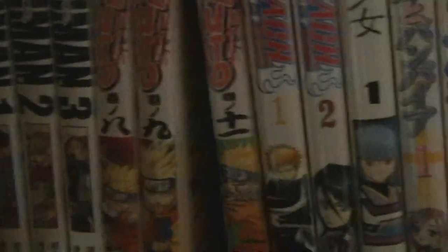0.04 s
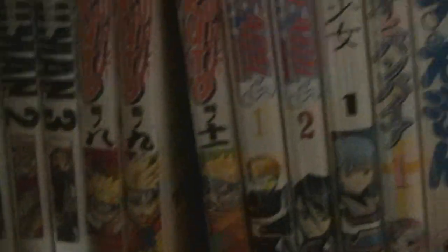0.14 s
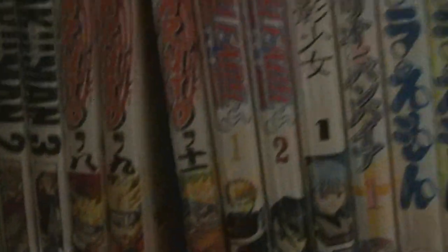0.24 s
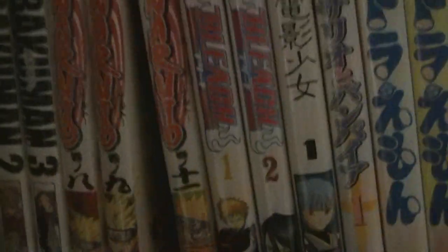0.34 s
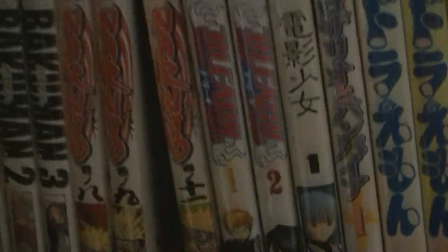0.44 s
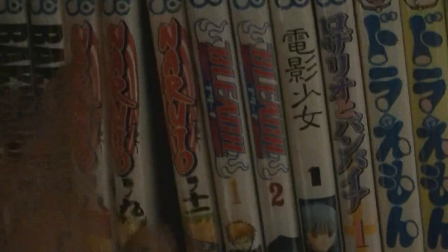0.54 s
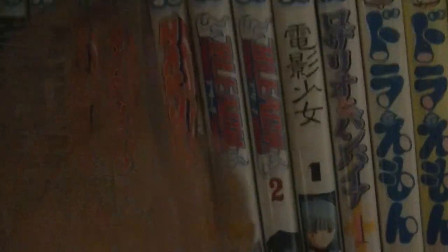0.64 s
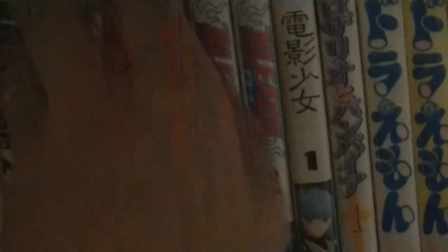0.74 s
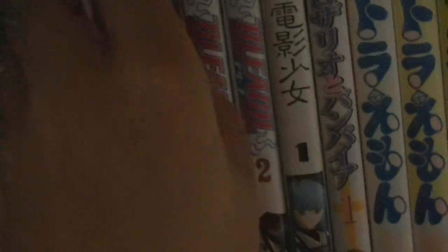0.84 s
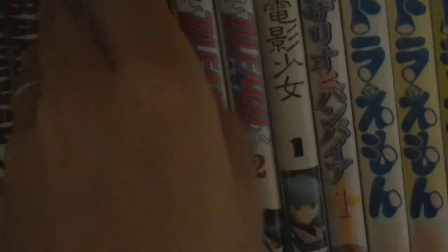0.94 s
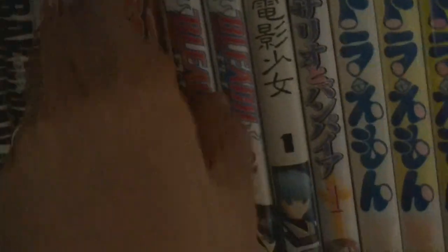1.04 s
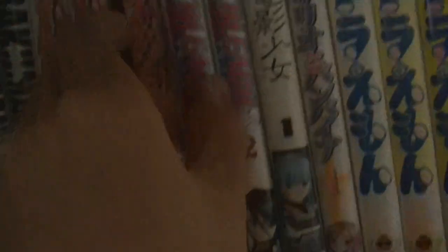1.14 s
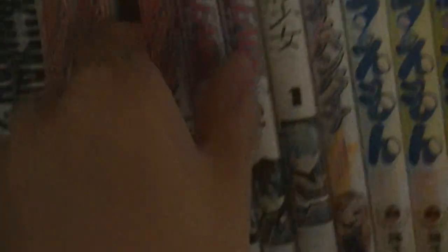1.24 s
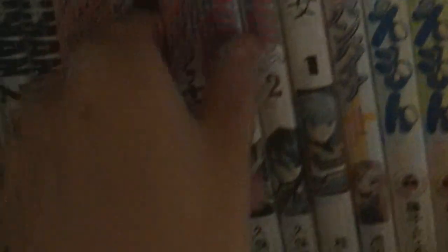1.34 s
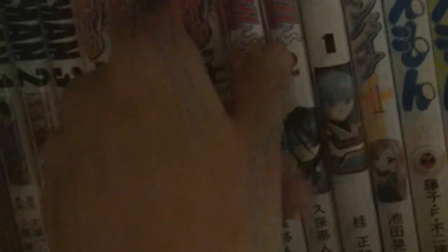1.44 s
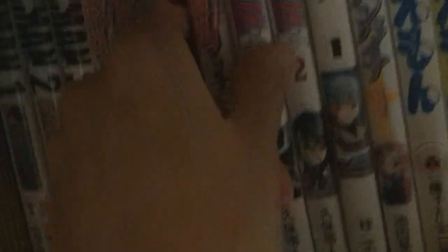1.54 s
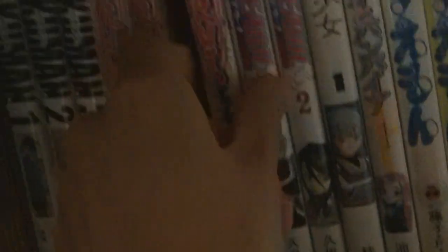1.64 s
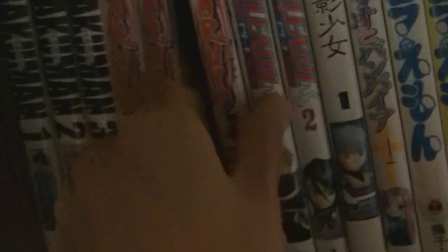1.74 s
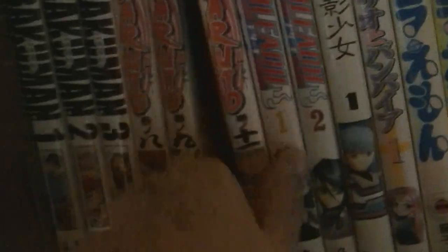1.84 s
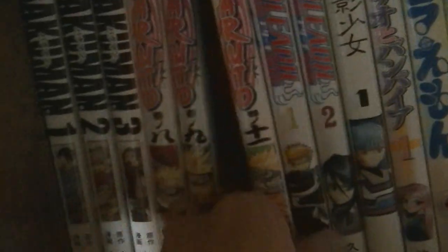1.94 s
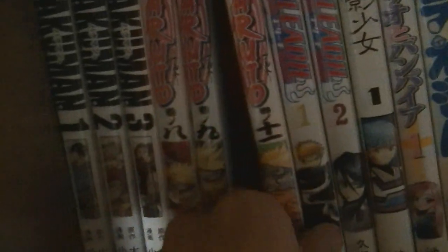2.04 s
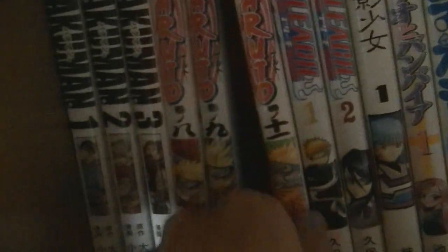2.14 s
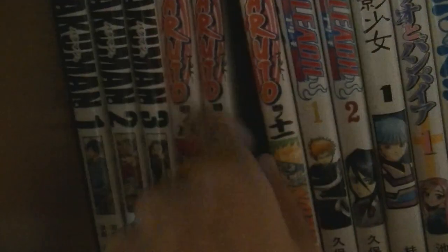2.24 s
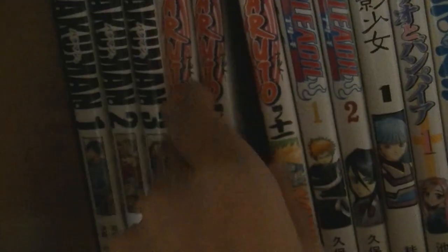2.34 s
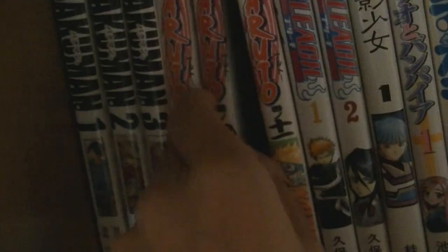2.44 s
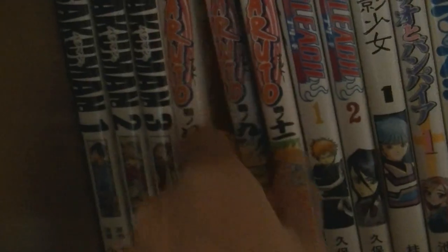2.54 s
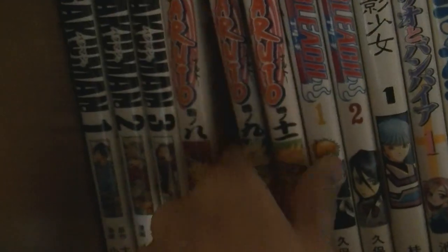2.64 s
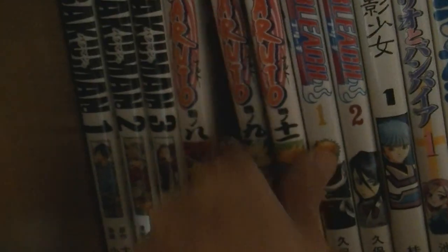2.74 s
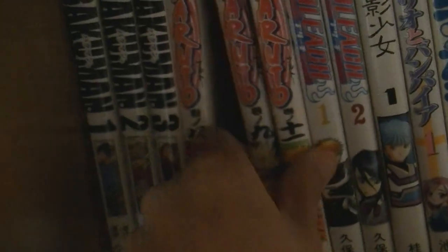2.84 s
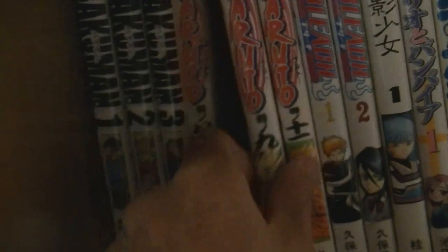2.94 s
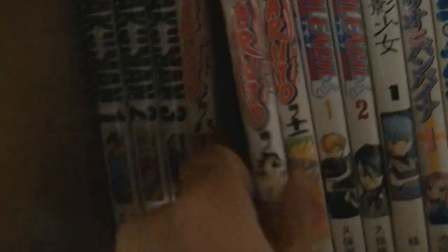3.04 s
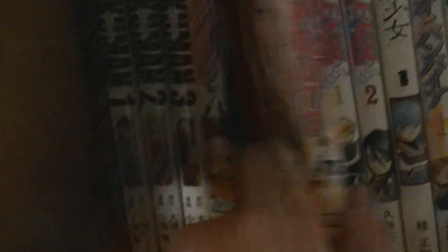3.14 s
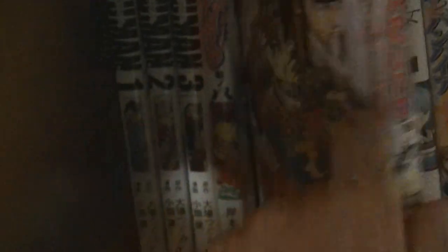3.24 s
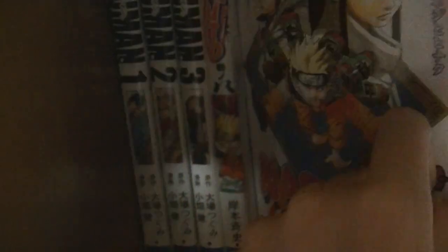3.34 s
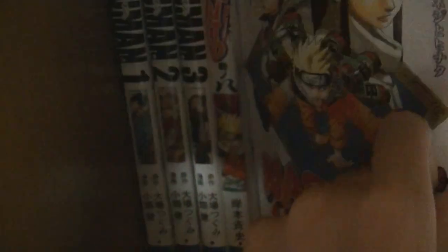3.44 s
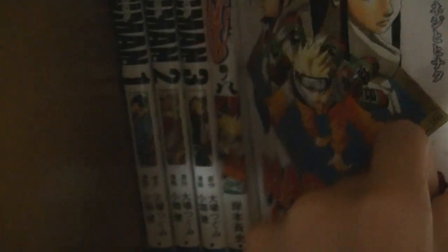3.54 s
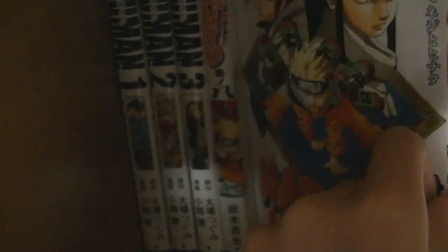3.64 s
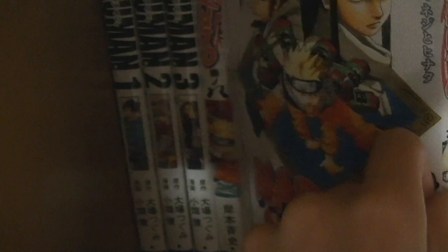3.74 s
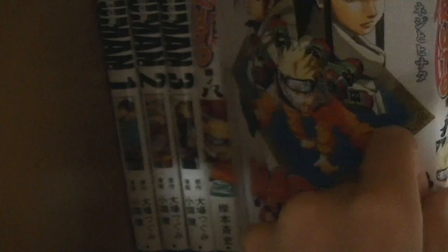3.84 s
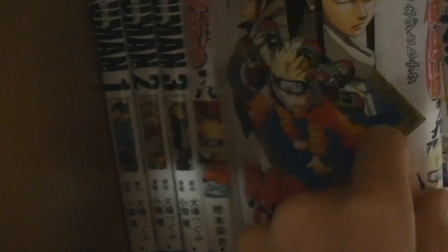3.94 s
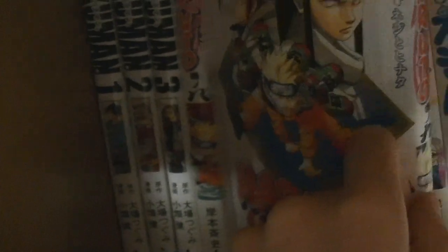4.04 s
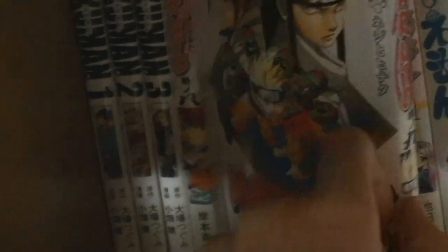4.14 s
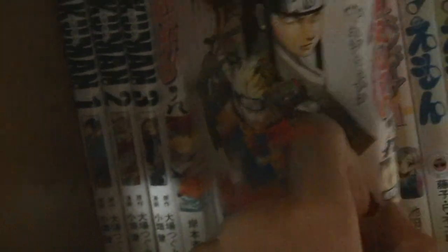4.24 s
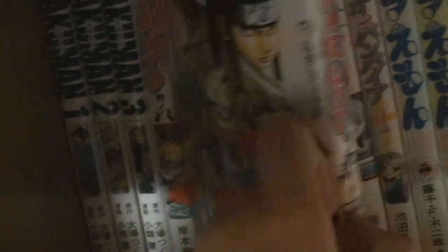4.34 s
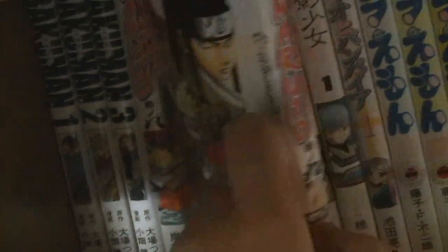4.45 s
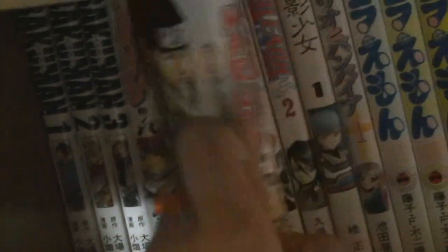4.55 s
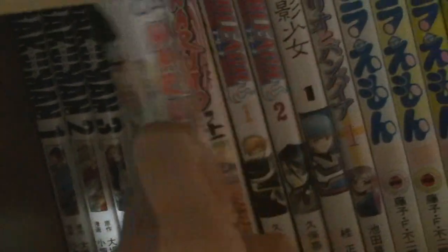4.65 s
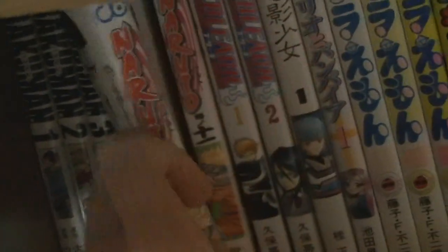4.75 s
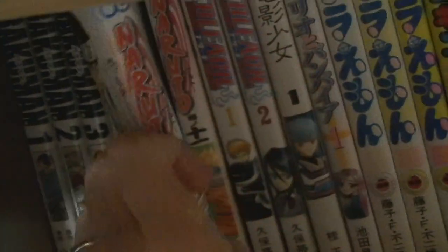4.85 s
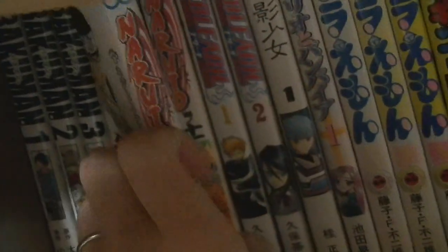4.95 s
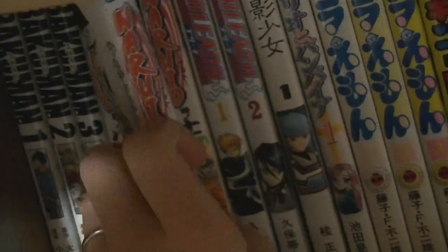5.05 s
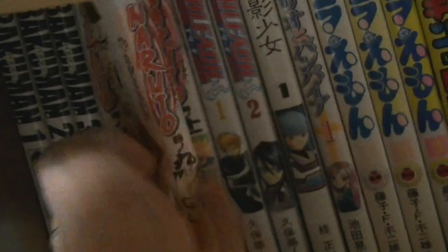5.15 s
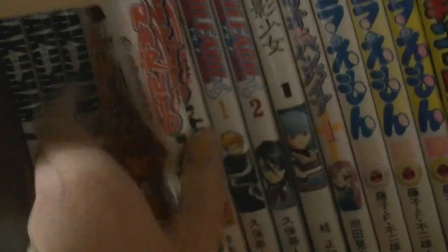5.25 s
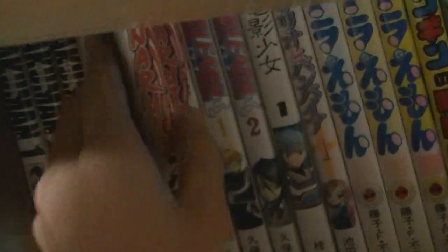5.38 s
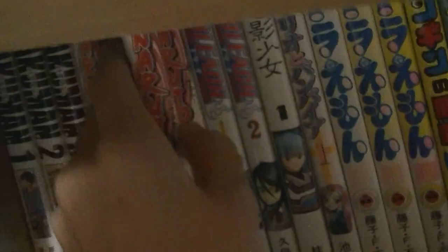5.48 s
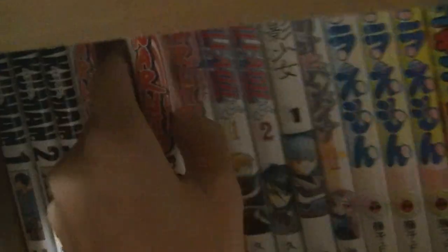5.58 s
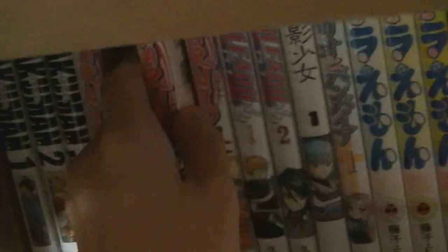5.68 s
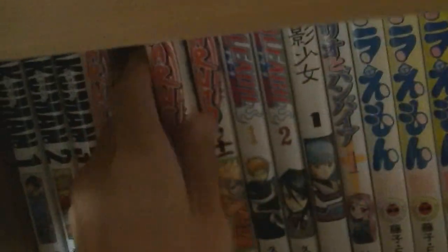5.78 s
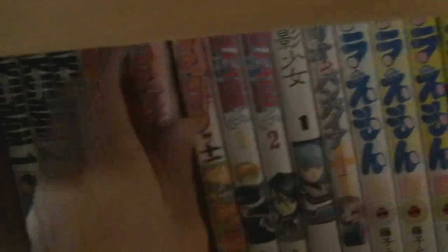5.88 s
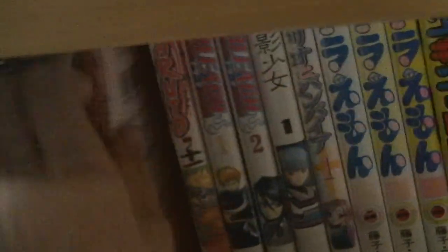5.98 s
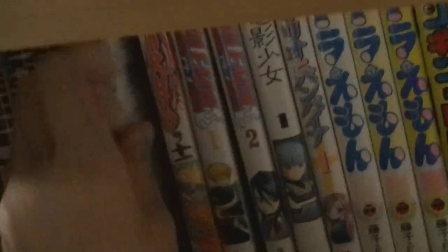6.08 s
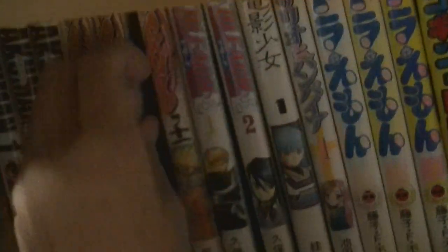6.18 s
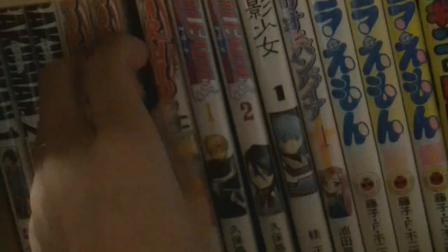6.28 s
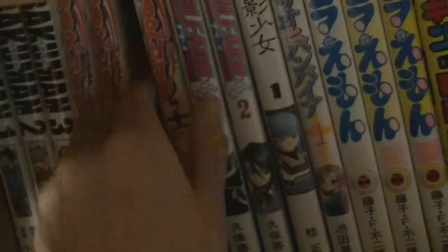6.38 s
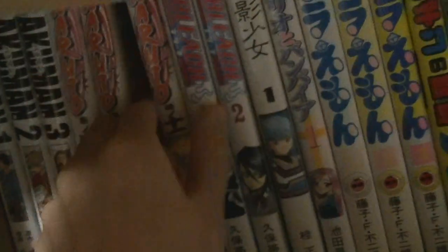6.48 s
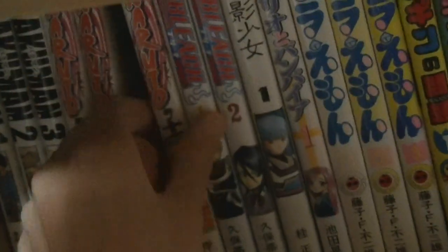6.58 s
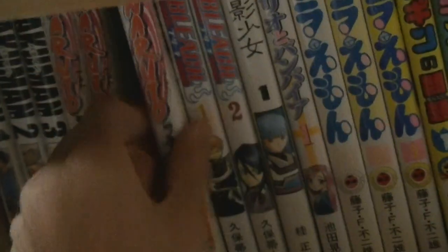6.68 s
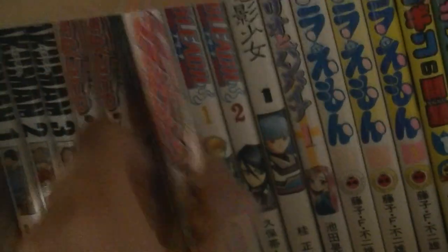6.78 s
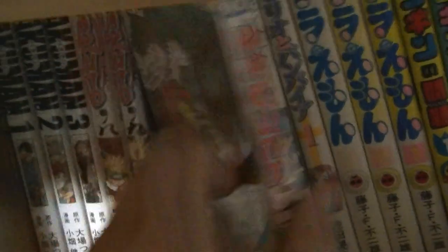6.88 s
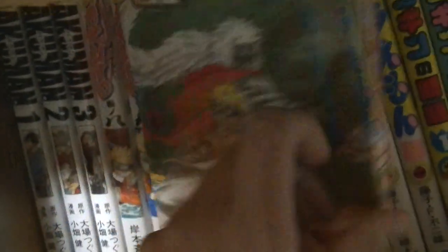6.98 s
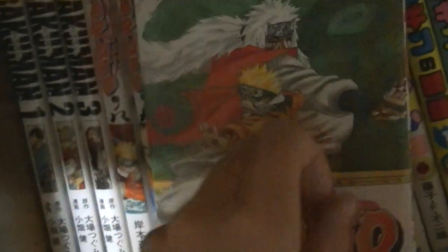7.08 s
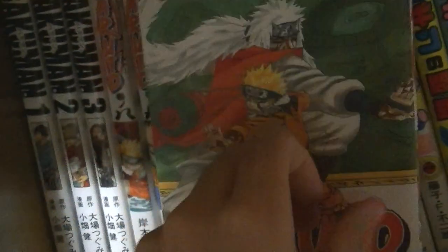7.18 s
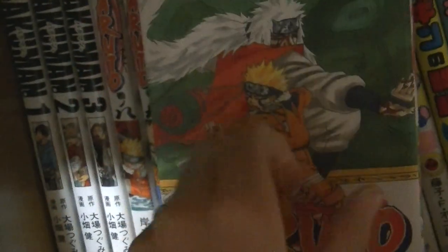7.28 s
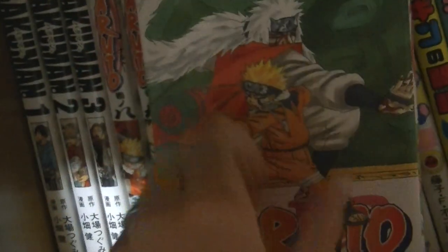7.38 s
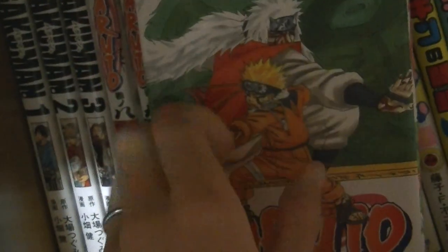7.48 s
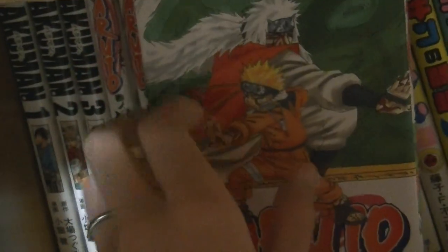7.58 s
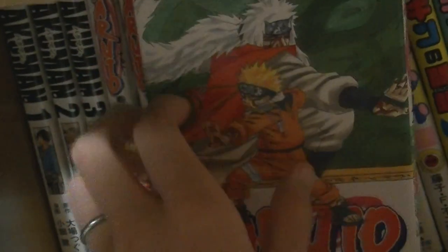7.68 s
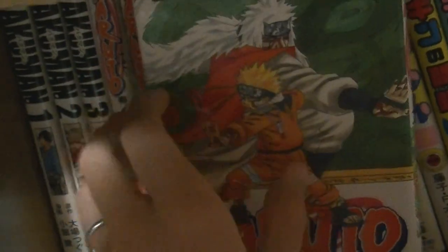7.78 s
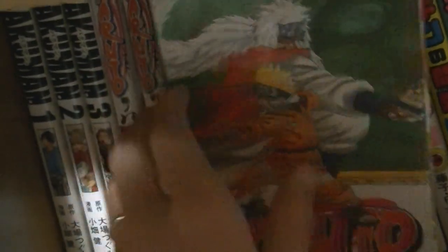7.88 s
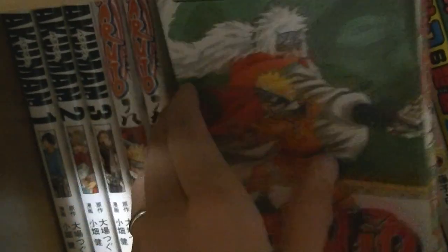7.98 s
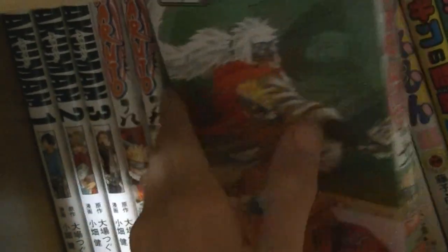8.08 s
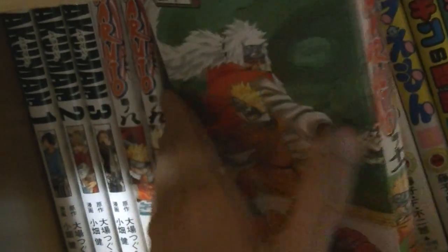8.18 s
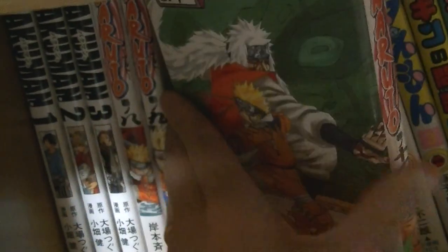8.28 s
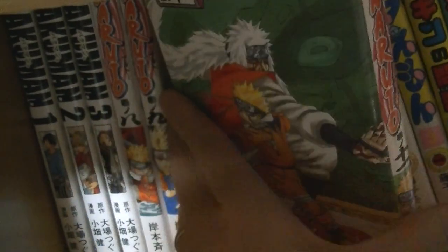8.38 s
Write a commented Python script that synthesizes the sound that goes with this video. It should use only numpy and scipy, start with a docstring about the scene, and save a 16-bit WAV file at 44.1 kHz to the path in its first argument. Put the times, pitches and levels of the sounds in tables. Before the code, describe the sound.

Paperbacks on a wooden shelf knock, rustle and slide as they are pulled out and pushed back, close up in a quiet room.

```python
"""A wooden shelf in a quiet room: paperbacks are pulled from and pushed into a row, close to the microphone.
Blows excite decaying modes of shelf and books. Fingers and covers slide with a papery hiss, page blocks rasp
and book edges drag on the board: all friction, made of random catches sent through filters and resonances.
Some rubs sing on one narrow note, and heavy shoves puff out air. Shaped noise makes the room and microphone
hiss. The books are nearly mono."""
import sys
import numpy as np
from scipy import signal
from scipy.fft import rfft, irfft, next_fast_len
from scipy.io import wavfile

SR = 44100
rng = np.random.default_rng(int(sys.argv[2]) if len(sys.argv) > 2 else 0)


def master_out(mix):
    """Clip the mix to full scale and print it as 16-bit PCM to the path in sys.argv[1]."""
    frames = np.transpose(np.atleast_2d(mix))
    ceiling = np.clip(frames, -1, 1)
    pcm = np.round(ceiling * 32767).astype(np.int16)
    wavfile.write(sys.argv[1], SR, pcm)


N = 371322   # length [samples]


def from_db(db):
    """Level definition: the amplitude gain of a level in dB."""
    return 10 ** (np.asarray(db) / 20)


def rms_one(x):
    """Normalisation of power: scale to rms 1."""
    return x / np.sqrt(np.mean(x ** 2) + 1e-20)


def butter(x, order, hz, kind="low"):
    """Butterworth filtering: a maximally flat passband."""
    return signal.sosfilt(signal.butter(order, hz, kind, fs=SR, output="sos"), x)


def drift(corner_hz):
    """Low-passed noise: a slow random wander of rms 1 through two equal poles."""
    step = 40   # samples between the points of the wander
    settle = 2000   # points dropped while the filter settles
    pole = np.exp(-2 * np.pi * corner_hz * step / SR)
    noise = rng.standard_normal(N // step + settle + 2)
    slow = rms_one(signal.lfilter([1], [1, -2 * pole, pole * pole], noise)[settle:])
    return np.interp(np.arange(N) / step, np.arange(len(slow)), slow)


def shaped(x, spectrum):
    """Spectral shaping: a gain curve drawn straight on a log-frequency axis; rms 1."""
    size = next_fast_len(N)
    hz, db = np.transpose(spectrum)
    bin_hz = np.arange(size // 2 + 1) * SR / size
    gain = from_db(np.interp(np.log(bin_hz + 1), np.log(hz), db))
    return rms_one(irfft(rfft(x, size) * gain, size)[:N])


def resonate(x, hz, width_hz):
    """Damped resonance: two poles, gain 1 on top; a wider peak rings shorter."""
    r = np.exp(-np.pi * width_hz / SR)
    poles = [1, -2 * r * np.cos(2 * np.pi * hz / SR), r * r]
    return signal.lfilter([(1 - r * r) / 2, 0, (r * r - 1) / 2], poles, x)


def slips(per_s, spread_db, clump_db, clump_hz):
    """Stick-slip friction: tiny catches at random moments, of uneven size, coming in clumps."""
    sizes = from_db(spread_db * np.minimum(rng.exponential(1, N), 4))
    signs = rng.choice([-1, 1], N)
    happens = rng.random(N) < per_s / SR
    return sizes * signs * happens * from_db(clump_db * drift(clump_hz)) + 1e-18


def soft(x, contact_hz):
    """Finite contact time: a low-pass rounds the start of the ring; peak 1."""
    x = butter(x, 2, contact_hz)
    return x / np.abs(x).max()


# Modes of the shelf board and book row: (frequency [Hz], level [dB], free ring T60 [s])
SHELF_MODES = [(130.6, -5.5, 0.2), (182.2, 1, 0.16), (222, -0.5, 0.11), (293, 1, 0.1), (360, -0.5, 0.082),
               (435.8, 6, 0.082), (522, -6.5, 0.21), (646, -1.5, 0.036), (797.6, -1, 0.057),
               (1000, 0.5, 0.044), (1145, 2, 0.029), (1396, -5.5, 0.039), (1673, 1, 0.014),
               (2290, -5.5, 0.013)]
# Blows of books on each other and on the shelf, levels before the shelf's bass cut:
# (time [s], clack peak [dB], thud peak [dB], favoured pitch [Hz], edge tick peak [dB], share of the free ring)
BLOWS = [(0.6733, -40, -40, 280, -25.5, 0.6), (0.6812, -23, -28.5, 310, -23.5, 0.9),
         (0.6935, -24, -28, 265, -26, 0.7), (0.7092, -6.5, -1, 410, -24, 0.56),
         (0.7225, -16.5, -4.5, 180, -54, 0.4), (0.747, -34, -24, 330, -56, 0.81),
         (1.1508, -48, -38, 220, -40, 0.76), (1.192, -19, -15, 383, -49, 0.58),
         (1.3632, -49, -30.5, 139, -55, 0.5), (1.495, -31.5, -26, 263, -53, 0.7),
         (1.5185, -21, -23, 232, -35, 0.86), (1.6955, -38, -37, 410, -57, 1),
         (1.7107, -41, -36.5, 330, -50, 0.67), (1.774, -52, -37, 280, -60, 0.5),
         (1.803, -50, -35, 300, -55, 0.56), (1.89, -55, -36.5, 220, -55, 0.99),
         (1.948, -48, -38, 220, -55, 0.74), (2.2117, -31.5, -34, 360, -29.5, 0.57),
         (2.2616, -22, -33, 390, -29, 0.45), (2.3411, -23, -34, 380, -27.5, 0.41),
         (2.5306, -30, -35, 370, -35, 0.34), (2.669, -42, -48, 300, -32.5, 0.6),
         (2.775, -32, -28, 240, -40, 1), (2.9619, -1, -11.5, 334, -39, 0.91),
         (3.207, -30, -56, 340, -32, 0.47), (3.2269, -27.5, -21, 390, -48, 0.93),
         (4.5723, -17.5, -30, 380, -36, 0.74), (4.6784, -29, -53, 310, -27.5, 0.89),
         (4.738, -30, -32, 200, -37, 0.6), (5.1121, -28.5, -34.5, 340, -41, 0.65),
         (5.2076, -33.5, -28, 300, -11.5, 0.75), (5.395, -29, -27.5, 410, -36, 0.89),
         (5.475, -24.5, -27.5, 278, -42, 1), (5.51, -28, -40, 300, -23.5, 0.6),
         (5.514, -28, -22.5, 200, -42, 0.52), (5.535, -43, -20, 170, -55, 0.38),
         (5.5585, -27, -18.5, 280, -25, 0.86), (5.5804, 2, -5, 400, -17.5, 0.86),
         (5.6104, -17, -15, 290, -30, 0.66), (5.637, -18.5, -22, 330, -22.5, 0.38),
         (5.6447, -22, -24, 230, -26, 0.48), (5.8108, -25.5, -23, 264, -45, 0.66),
         (5.8757, -17.5, -24, 425, -37, 0.44), (5.918, -26, -26.5, 270, -32, 0.64),
         (6.022, -25.5, -25.5, 207.7, -26, 0.75), (6.1529, -3.5, -12.5, 373, -19.5, 1),
         (6.16, -14, -2.5, 343, -37, 0.78), (6.167, -24, -5, 300, -49, 0.86),
         (6.177, -19.5, -7, 131, -52, 0.72), (6.5757, -9.5, -16.5, 310, -37, 0.77),
         (6.8192, -9, -1, 366, -38, 0.72), (6.838, -26, -27, 300, -45, 0.83),
         (6.9033, -19, -13.5, 210, -28, 1), (6.9157, -12.5, -15, 240, -23, 0.59),
         (6.934, -9.5, -19, 250, -24, 0.38), (6.9426, -13.5, -10, 290, -19.5, 0.49),
         (6.982, -18.5, -14, 252, -18, 0.88), (7.1017, -20, -17.5, 230, -36, 0.82),
         (7.1211, -28, -27, 201, -38, 1), (7.262, -42, -64, 348, -38, 1), (7.271, -37, -38, 190, -49, 1),
         (7.802, -33, -30, 210, -41, 0.81), (7.822, -20.5, -31, 200, -33, 1),
         (8.0096, -25, -21.5, 217, -45, 1), (8.2324, -39.5, -32, 232.9, -48, 0.8)]
CLACK_FROM_HZ = 600   # modes above form the clack, the others the thud
FAVOUR_OCTAVES, FAVOUR_DEPTH_DB = 0.45, 11.5   # spread and boost of the modes near the favoured pitch
CLACK_CONTACT_HZ, THUD_CONTACT_HZ = 2420, 676   # contact low-pass when clack and thud are equal; of any thud
SHARPER_OCTAVES_PER_DB = 0.07   # a blow that is more clack than thud has a harder, shorter contact
SPREAD_S = 0.0012   # scale of the random delay of the lower modes
TICK_T60_S, TICK_HZ, TICK_TOP_HZ = 0.012, 2150, 7800   # decay and band of the edge tick


def edge_ticks(length):
    """Broadband impact noise: one decaying burst of band-passed noise for each blow; peak 1."""
    grit = rng.standard_normal((len(BLOWS), length))
    grit = butter(grit, 1, [TICK_HZ, TICK_TOP_HZ], "band")
    grit = grit * from_db(-60 * np.arange(length) / SR / TICK_T60_S)
    return grit / np.abs(grit).max(axis=1, keepdims=True)


def knocks():
    """Modal excitation: each blow rings the upper modes as a clack and the lower as a thud; its edge ticks."""
    out, t = np.zeros(N + SR), np.arange(SR // 4) / SR
    hz, db, t60 = np.repeat(np.transpose(SHELF_MODES), 2, axis=1)   # every mode splits into a close pair
    upper = hz > CLACK_FROM_HZ
    luck = rng.standard_normal((len(BLOWS), 3, len(hz)))
    for blow, (strength, detune, lateness), tick in zip(BLOWS, luck, edge_ticks(len(t))):
        s, clack_db, thud_db, favoured_hz, tick_db, share = blow
        contact_hz = CLACK_CONTACT_HZ * 2 ** (SHARPER_OCTAVES_PER_DB * (clack_db - thud_db))
        nearness = np.exp(-.5 * (np.log2(hz / favoured_hz) / FAVOUR_OCTAVES) ** 2)
        gains = from_db(db + FAVOUR_DEPTH_DB * nearness + 2.2 * strength)
        pitch = hz * (1 + 0.065 * detune)   # the row is loaded differently each time
        # the modes join in one after another as the blow spreads through the row
        late_s = SPREAD_S * np.abs(lateness) * np.minimum(CLACK_FROM_HZ / hz, 1) ** 2
        since = np.maximum(t - (late_s - late_s.min())[:, None], 0)
        decay = from_db(-60 * since / (t60[:, None] * max(share, .1)))
        rings = np.sin(2 * np.pi * pitch[:, None] * since) * decay
        clack = from_db(clack_db) * soft((gains * upper) @ rings, min(contact_hz, SR / 4))
        thud = from_db(thud_db) * soft((gains * ~upper) @ rings, THUD_CONTACT_HZ)
        at = round(s * SR)
        # the thud swings back against the clack
        out[at:at + len(t)] += clack - thud + from_db(tick_db) * tick
    return out[:N]


# Short strokes of fingers and books; at start and stop the level is down by the swell and fade depths:
# (start [s], fastest [s], stop [s], cover hiss [dB], page block rasp [dB], drag on the board [dB])
SHORT_STROKES = [(0.0, 0.528, 1.8, -63.5, -64.5, -60), (0.668, 0.685, 0.84, -44, -45, -41),
                 (0.868, 0.882, 0.94, -48, -74, -69), (0.925, 1.187, 1.64, -55.5, -60, -55.5),
                 (1.483, 1.51, 1.64, -53, -54, -50), (1.56, 1.626, 1.71, -48.5, -43.5, -58),
                 (1.708, 1.845, 2.055, -49.5, -51, -52), (2.01, 2.178, 2.27, -50, -59, -64),
                 (2.264, 2.302, 2.47, -55, -62, -53), (2.528, 2.564, 2.614, -39, -37.5, -42),
                 (2.593, 2.644, 2.85, -56, -51.5, -52.5), (2.753, 2.765, 2.82, -55, -43.5, -45),
                 (3.19, 3.207, 3.24, -33, -39, -45), (3.208, 3.315, 3.4, -44, -41, -44),
                 (4.017, 4.124, 4.3, -71, -55, -56), (5.128, 5.149, 5.23, -42.5, -40.5, -40.5),
                 (5.204, 5.265, 5.51, -46, -51.5, -46), (5.363, 5.427, 5.42, -54.5, -40, -41.5),
                 (5.447, 5.469, 5.55, -48, -37.5, -41), (5.507, 5.51, 5.57, -54.5, -34.5, -34),
                 (5.542, 5.551, 5.7, -52.5, -39, -33.5), (5.581, 5.614, 5.756, -37.5, -32, -30.5),
                 (5.677, 5.86, 5.99, -51.5, -45.5, -44.5), (5.892, 5.978, 6.15, -45, -40, -38.5),
                 (6.044, 6.157, 6.18, -38.5, -37, -35), (6.15, 6.205, 6.26, -71, -49.5, -37),
                 (6.25, 6.304, 6.42, -54, -75, -62), (6.333, 6.423, 6.45, -52.5, -60, -55),
                 (6.455, 6.483, 6.64, -59, -61, -57.5), (7.248, 7.262, 7.5, -60, -60, -66),
                 (7.502, 7.564, 7.78, -54.5, -47.5, -48), (7.618, 7.697, 7.74, -46.5, -41, -55.5),
                 (7.797, 7.821, 8.1, -58, -36, -45), (7.808, 7.925, 8.005, -37, -36.5, -47.5),
                 (7.975, 8.017, 8.05, -53, -45.5, -55), (8.02, 8.127, 8.21, -45.5, -44, -50),
                 (8.154, 8.205, 8.56, -57, -59.5, -57)]
SWELL_DB, SWELL_POWER, FADE_DB, FADE_POWER = 18.5, 1.53, 25.5, 1.2   # depth and curvature of rise and fall
# top of the hiss, relative to the hiss, in short strokes; it sinks as the rasp outweighs the hiss
STROKE_TOP_DB, DULLER_PER_DB = 5, 0.2
# A whole book is drawn out, pushed in, drawn out; one curve for each slide:
# (time [s], cover hiss [dB], page block rasp [dB], drag on the board [dB])
SLIDE_CURVES = [
    [(2.79, -66, -56, -40), (2.88, -49, -50.5, -56.5), (3.01, -45.5, -41.5, -46), (3.03, -37, -38.5, -37),
     (3.15, -41.5, -60, -39.5), (3.175, -49, -47, -54), (3.20, -69, -51, -43)],
    [(4.19, -78, -64, -62), (4.30, -60, -50, -45.5), (4.55, -49, -44, -39), (4.63, -52, -46, -41.5),
     (4.72, -45, -39.5, -42), (4.76, -52, -46.5, -48), (4.83, -44.5, -38, -42), (4.98, -41, -45, -42.5),
     (5.09, -44, -43, -47.5), (5.125, -61, -60, -57)],
    [(6.56, -68, -68, -52), (6.60, -44.5, -45.5, -55), (6.72, -45.5, -48.5, -51.5),
     (6.88, -43, -40.5, -33.5), (6.95, -49, -48, -38), (7.0, -44.5, -41.5, -46), (7.11, -48, -38, -51),
     (7.145, -77, -57, -64)],
]
# Top of the hiss relative to the hiss, one value for each long slide: (level [dB])
SLIDE_TOP_LEVELS = [10.5, 1.5, 7.5]


def sliding():
    """Addition of powers: gains of hiss, rasp, drag and top; strokes swell and fade, slides follow curves."""
    power, t = np.zeros((4, N)), np.arange(N) / SR
    for start, fastest, stop, hiss_db, rasp_db, drag_db in SHORT_STROKES:
        # the tails run on to twice the time between start or stop and the fastest moment
        now = slice(max(round((2 * start - fastest) * SR), 0), round((2 * stop - fastest) * SR))
        before = np.maximum(fastest - t[now], 0) / max(fastest - start, .002)
        after = np.maximum(t[now] - fastest, 0) / max(stop - fastest, .002)
        shape = from_db(-SWELL_DB * before ** SWELL_POWER - FADE_DB * after ** FADE_POWER)
        top_db = hiss_db + STROKE_TOP_DB - DULLER_PER_DB * (rasp_db - hiss_db)
        power[:, now] += np.outer(from_db([hiss_db, rasp_db, drag_db, top_db]), shape) ** 2
    for curve, top_db in zip(SLIDE_CURVES, SLIDE_TOP_LEVELS):
        s, hiss_db, rasp_db, drag_db = np.transpose(curve)
        now = slice(round(s[0] * SR), round(s[-1] * SR))
        levels = (hiss_db, rasp_db, drag_db, hiss_db + top_db)
        power[:, now] += [from_db(np.interp(t[now], s, db)) ** 2 for db in levels]
    return np.sqrt(power)


# Spectrum of the cover hiss: (frequency [Hz], relative level [dB per Hz])
COVER_SPECTRUM = [(1060, -8.5), (2410, -5), (2900, -3.5), (4020, -6), (7090, -8), (9250, -11), (13300, -20),
                  (16000, -26)]
BRIGHT_HZ = 9700   # the top of the hiss begins here


def cover_hiss():
    """Dense friction noise of skin and glossy card: very many fine catches; the finest form the top."""
    coarse = shaped(slips(9000, spread_db=1.5, clump_db=2.5, clump_hz=43), COVER_SPECTRUM)
    fine = shaped(slips(15000, spread_db=1.5, clump_db=2.5, clump_hz=35), COVER_SPECTRUM)
    return butter(coarse, 2, BRIGHT_HZ), butter(fine, 2, BRIGHT_HZ, "high")


# Resonances of the page block: (frequency [Hz], base width, broadened in use [Hz], relative level [dB])
PAGE_RESONANCES = [(754, 284, -1), (1050, 198, 4.5), (1510, 296, 1), (2085, 1300, -14)]


def page_rasp():
    """Friction-driven resonance: page blocks rubbing ring in a few broad bands."""
    catches = slips(2500, spread_db=3.5, clump_db=3.0, clump_hz=40)
    total = np.zeros(N)
    for k, (hz, width, db) in enumerate(PAGE_RESONANCES):
        band = resonate(resonate(catches, hz, 3.0 * width), hz, 3.2 * width)
        total += (-1) ** k * from_db(db) * band
    return rms_one(total)


def board_drag():
    """Friction-driven modes: book feet dragging shake the lower shelf modes, damped by the load."""
    catches = slips(1500, spread_db=3.0, clump_db=2.5, clump_hz=30)
    total = np.zeros(N)
    for k, (hz, db, t60) in enumerate(SHELF_MODES):
        if hz < 700:
            total += (-1) ** k * from_db(db) * resonate(catches, hz, 4.4 / t60)   # 2.2 / t60 rings freely
    return rms_one(total)


PATCH_DB, PATCH_HZ = 2.5, 6   # rms and corner frequency of the wander


def patchy(x):
    """Spectral fluctuation: the colour of a rub wanders as third-octave bands swell and sink on their own."""
    edges = 900 * 2 ** (np.arange(12) / 3)
    out = x.copy()
    for pair in zip(edges, edges[1:]):
        band = butter(x, 2, pair, "band")
        out += band * (from_db(PATCH_DB * drift(PATCH_HZ)) - 1)
    return out


# A rub settles on one narrow note for a while:
# (start [s], end [s], frequency [Hz], width of each of two passes [Hz], rms before the fades [dB])
SINGING_NOTES = [(0.01, 0.455, 340, 108, -53), (0.05, 0.42, 970, 200, -61.5),
                 (1.122, 1.156, 1030, 260, -45.5), (2.978, 3.145, 1144, 70, -41),
                 (3.055, 3.14, 796, 100, -42), (3.01, 3.114, 6850, 500, -40.5),
                 (4.027, 4.177, 455, 59.5, -53.5), (4.225, 5.14, 488, 73.4, -47.5),
                 (4.452, 5.15, 1580, 203, -44), (5.629, 5.748, 1790, 200, -44.5),
                 (7.06, 7.081, 1070, 150, -32.5), (7.846, 7.973, 1380, 250, -40)]


def singing_rubs():
    """Selective resonance: friction passes twice through one cover resonance, swelling and fading."""
    catches, out = slips(4000, spread_db=1.5, clump_db=0.5, clump_hz=51.5), np.zeros(N)
    for start, end, hz, width, db in SINGING_NOTES:
        a, b = round(start * SR), round(end * SR)
        note = resonate(resonate(catches[a:b], hz, width), hz, width)
        out[a:b] += from_db(db) * rms_one(note) * np.sqrt(np.hanning(b - a))
    return out


# Heavy shoves squeeze air out from between the books: (time [s], level before the fades [dB])
AIR_SHOVES = [(0.705, -28), (1.358, -45), (1.51, -46), (6.155, -23)]
PUFF_S = 0.022


def air_puffs():
    """Volume displacement: one slow push and pull of air, a single faded sine cycle."""
    out, swing = np.zeros(N), np.sin(2 * np.pi * np.linspace(0, 1, round(PUFF_S * SR)))
    for s, db in AIR_SHOVES:
        at = round(s * SR)
        out[at:at + len(swing)] += from_db(db) * swing * np.hanning(len(swing))
    return out


# Spectrum of room air and microphone hiss: (frequency [Hz], relative level [dB per Hz])
ROOM_SPECTRUM = [(15, -52.5), (25, -12), (120, -7.5), (212, -9.5), (300, -8), (840, -14.5), (3080, -20.5),
                 (16000, -32.5)]
# Colour of the side against the mid, before overall levels are set: (frequency [Hz], side minus mid [dB])
ROOM_SIDE_TILT = [(60, -4), (240, 1), (3770, -0.5), (15000, -16.5)]
ROOM_DB = -57.5   # rms of the mid


def background():
    """Incoherent noise: room air and microphone hiss, mostly unrelated in the two channels; mid and side."""
    hz, mid_db = np.transpose(ROOM_SPECTRUM)
    tilt_hz, tilt_db = np.transpose(ROOM_SIDE_TILT)
    side_db = mid_db + np.interp(np.log(hz), np.log(tilt_hz), tilt_db)
    mid = shaped(rng.standard_normal(N), ROOM_SPECTRUM)
    side = shaped(rng.standard_normal(N), np.c_[hz, side_db])
    return from_db(ROOM_DB) * mid, from_db(ROOM_DB - 4.0) * side


SHELF_LOW_CUT_HZ = 95.5
SIDE_DB, SIDE_LOW_CUT_HZ = -31.5, 706   # gain and bass cut of the books' side signal


def scene():
    """Superposition in mid and side: the books sit in the middle, nearly mono, with a faint diffuse side."""
    hiss, rasp, drag, top = sliding()
    low_hiss, top_hiss = cover_hiss()
    rubs = patchy(hiss * low_hiss + rasp * page_rasp()) + top * top_hiss
    # a small board radiates little deep bass
    shelf = butter(drag * board_drag() + knocks(), 3, SHELF_LOW_CUT_HZ, "high")
    books = rubs + air_puffs() + singing_rubs() + shelf
    # a short noise burst blurs the books into a faint, slightly diffuse side signal
    blur = rng.standard_normal(SR // 100) * np.hanning(SR // 100)
    side = signal.fftconvolve(books, blur / np.linalg.norm(blur))[:N]
    side = from_db(SIDE_DB) * butter(side, 1, SIDE_LOW_CUT_HZ, "high")
    air_mid, air_side = background()
    return books + air_mid + (side + air_side) * np.array([[1], [-1]])


CUTOFF_HZ = 16450


def record(dry):
    """Overload and band limiting: full scale clips, then a steep low-pass cuts the top."""
    steep = signal.cheby2(20, 80, CUTOFF_HZ, fs=SR, output="sos")
    return signal.sosfilt(steep, np.clip(dry, -1, 1))


dry = scene()
out = record(dry)
master_out(out)
```